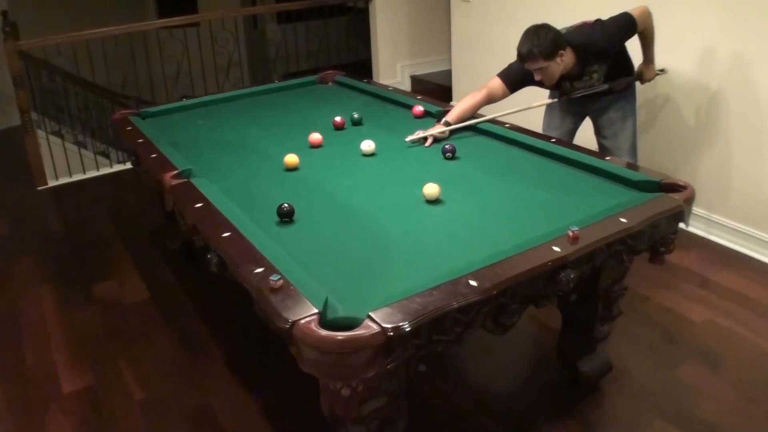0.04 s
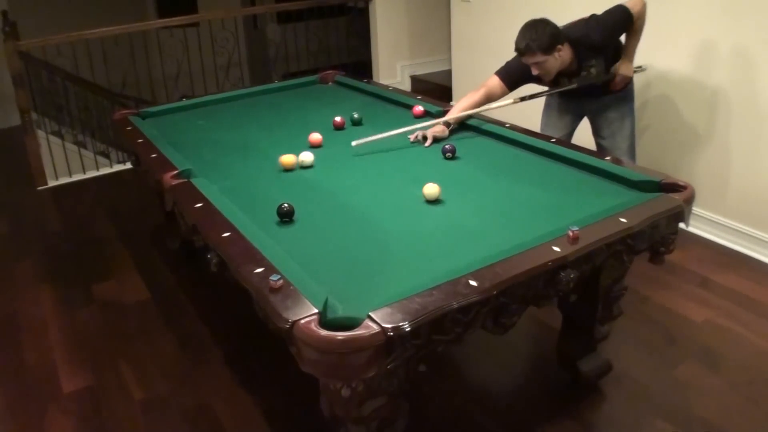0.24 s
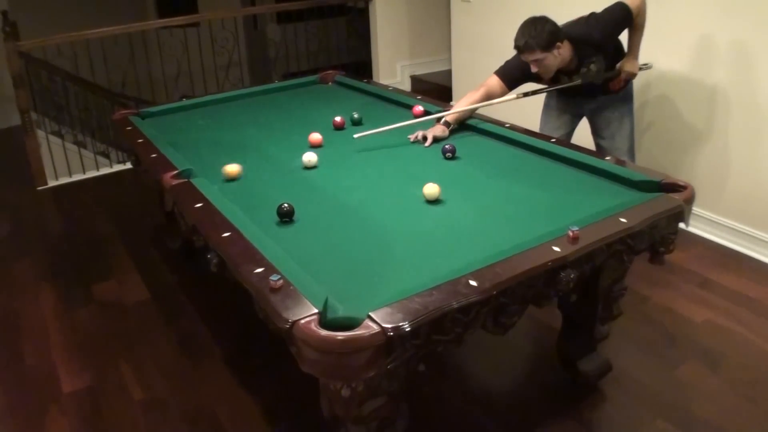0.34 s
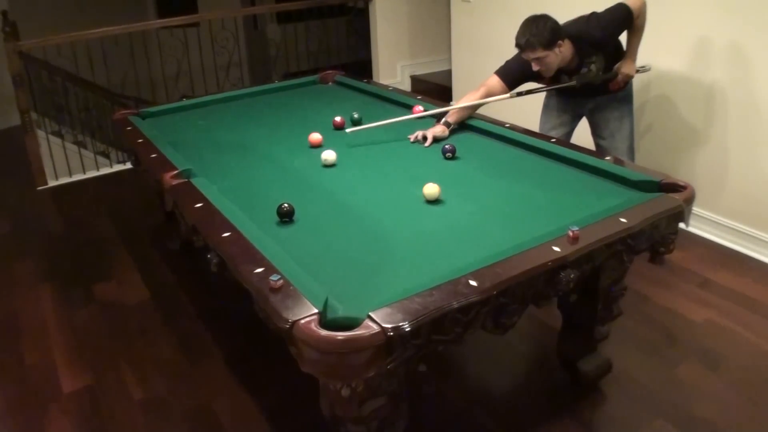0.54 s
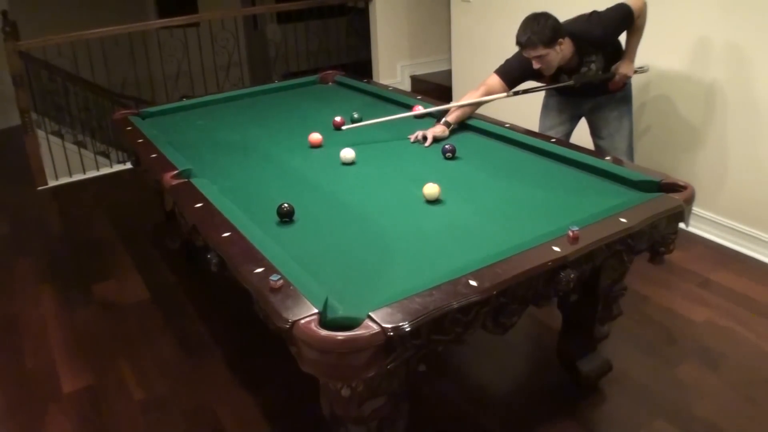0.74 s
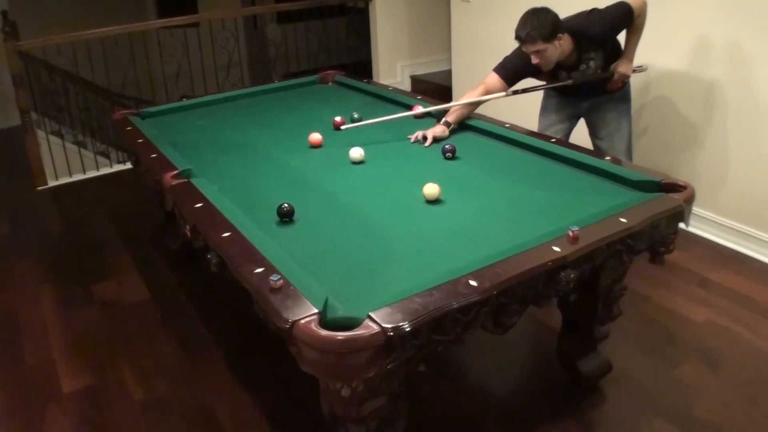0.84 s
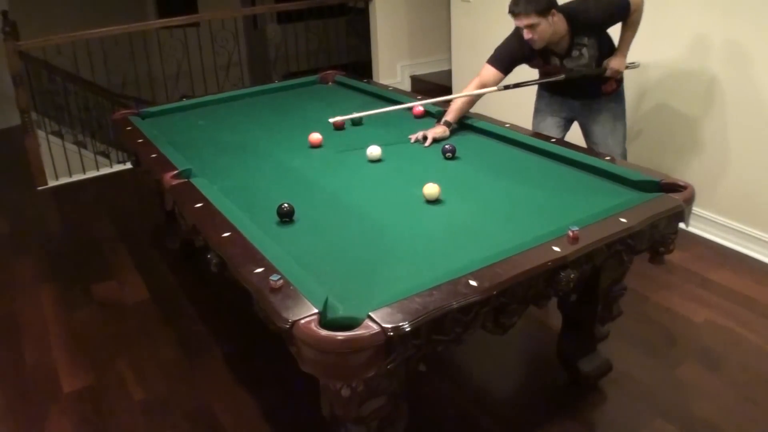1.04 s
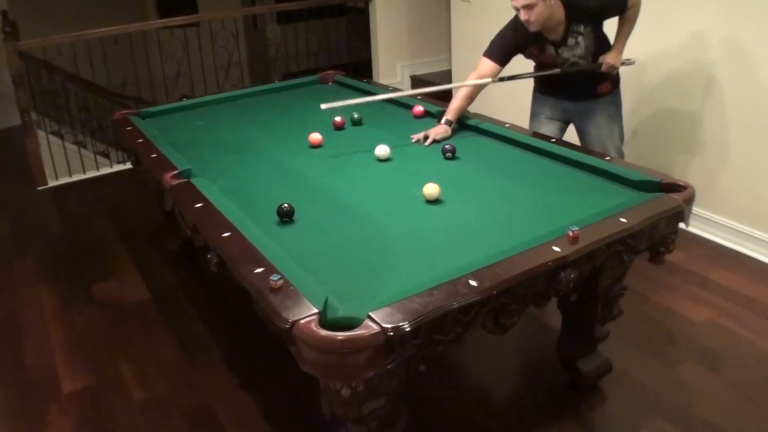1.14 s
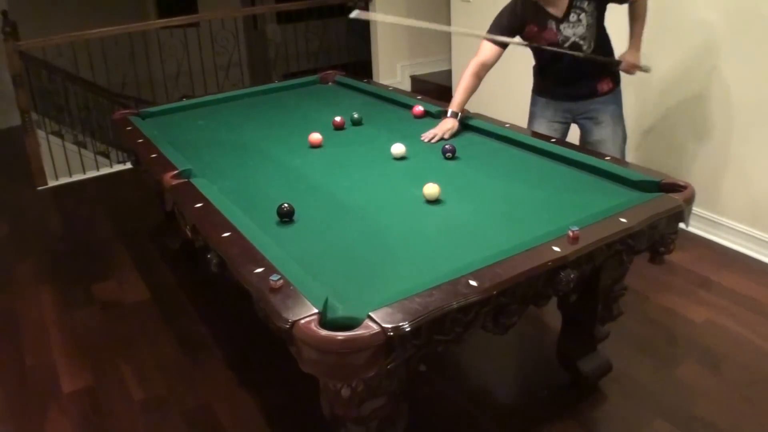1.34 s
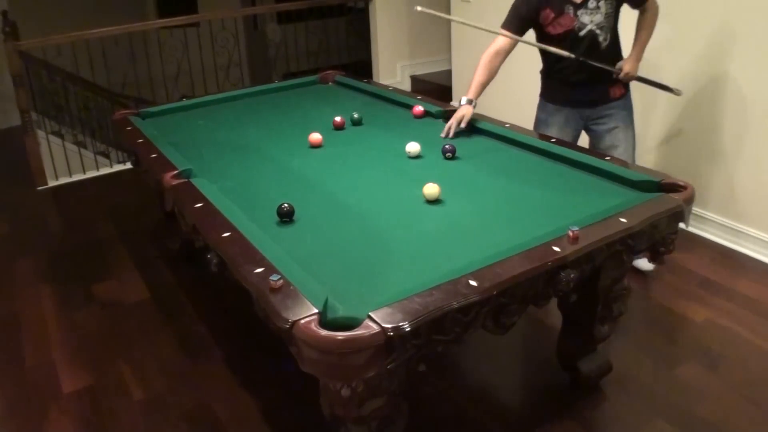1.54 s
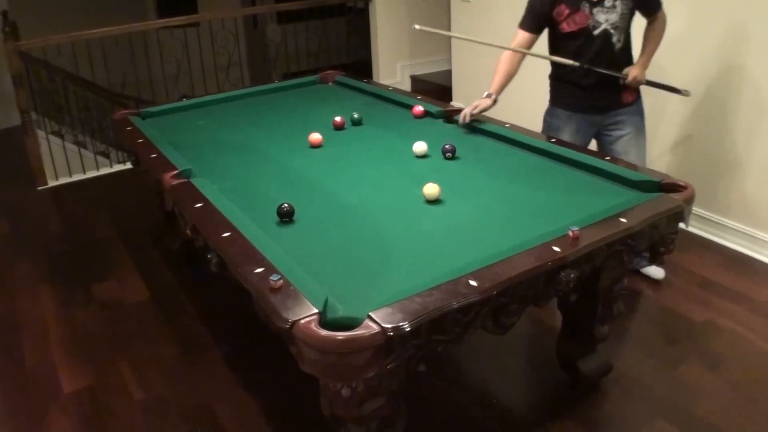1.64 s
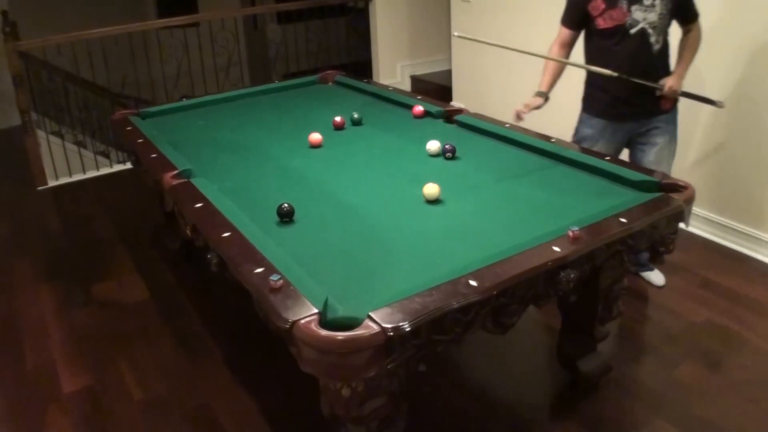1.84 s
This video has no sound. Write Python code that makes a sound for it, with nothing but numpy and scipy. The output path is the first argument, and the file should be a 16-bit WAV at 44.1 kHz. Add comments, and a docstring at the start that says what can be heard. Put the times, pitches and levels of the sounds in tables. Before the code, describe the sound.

A pool shot rings out in a reverberant room. The cue taps a ball, which clacks hard against another; that one rolls briefly, thuds into a padded pocket and clicks against the balls inside. Clothes rustle faintly afterward.

```python
"""Pool shot in a live room

The cue tip knocks the cue ball and the shaft shudders and rings; the cue ball clacks against a second ball.
That ball rolls, thuds into a padded pocket and clicks down on the balls lying there, while the table
frame booms softly. The player's clothes rustle as he straightens up. Every hit rings out in a room
with a wooden floor."""
import sys
import numpy as np
from scipy import signal
from scipy.fft import rfft, irfft
from scipy.io import wavfile

SR = 44100
rng = np.random.default_rng(int(sys.argv[2]) if len(sys.argv) > 2 else 0)


def transcribe(u):
    """Save the signal u as a 16-bit wav file named by the first command-line argument.

    u: samples, shape (n,) or (channels, n), limited to [-1, 1]; the rate is SR.
    q: integer samples, one column per channel.
    """
    v = np.clip(np.atleast_2d(u).T, -1, 1)
    q = np.round(v * 32767).astype(np.int16)
    wavfile.write(sys.argv[1], SR, q)


N = 83790

# glassy snap of ball on ball: freq_hz, relative_db
SNAP_TONE = [(500, -38), (5000, -52), (8000, -17), (9400, 10), (11000, -4), (12500, -12), (13800, -4),
             (15300, -11), (16500, -12)]


def amp(db):
    """Decibels to gain."""
    return 10 ** (np.asarray(db) / 20)


def curve_at(points, hz):
    """Reads a curve on a log-frequency axis."""
    freq_hz, value = np.transpose(points)
    return np.interp(np.log(hz + 1), np.log(freq_hz + 1), value)


def unit(x):
    """Scales to an average energy of 1 per channel."""
    return x / np.sqrt(np.mean(np.sum(x ** 2, -1)) + 1e-20)


def add(mix, start_s, level_db, sound):
    """Lays a stereo sound into the mix."""
    part = mix[:, round(start_s * SR):][:, :sound.shape[1]]
    part += amp(level_db) * sound[:, :part.shape[1]]


def impact(tone, size=4096):
    """A contact: the tightest causal pulse with this spectrum."""
    log_gain = np.log(amp(curve_at(tone, abs(np.fft.fftfreq(size, 1 / SR)))))
    minimum_phase = np.exp(np.conj(signal.hilbert(log_gain)))
    return unit(np.fft.ifft(minimum_phase).real[:size // 2])


def ring(modes, rise_s):
    """A struck body: dying sines with a soft attack."""
    t = np.arange(SR // 2) / SR
    partials = sum(amp(db - 60 * t / t60) * np.sin(2 * np.pi * hz * t) for hz, db, t60 in modes)
    return unit(np.minimum(t / rise_s, 1) * partials)


def diffuse(pair):
    """Gives two unrelated signals the width of a diffuse field, nearly mono in the bass."""
    # likeness of left and right: freq_hz, coherence (0-1)
    coherence = [(60, .993), (130, .987), (280, .973), (450, .945), (700, .81), (1400, .57), (3000, .65),
                 (7000, .57), (10000, .55), (14000, .92)]
    likeness = curve_at(coherence, np.fft.rfftfreq(N, 1 / SR))
    mid, side = rfft(pair) * np.sqrt([(1 + likeness) / 2, (1 - likeness) / 2])
    return irfft(np.array([mid + side, mid - side]), N)


def noise_bed(tone):
    """Diffuse noise of rms 1 with this spectrum."""
    white = diffuse(rng.standard_normal((2, N)))
    spectrum = rfft(white) * amp(curve_at(tone, np.fft.rfftfreq(N, 1 / SR)))
    return unit(irfft(spectrum, N)) * np.sqrt(N)


def fader(points):
    """Gain that rides through points of time_s, level_db."""
    return amp(np.interp(np.arange(N) / SR, *np.transpose(points)))


def room_tail():
    """Grainy reverb that builds quickly and dies band by band, the mids last."""
    # reverb time: freq_hz, t60_s
    decay = [(100, 1.02), (250, 0.94), (600, 1.12), (1400, 1.564), (2500, 1.1), (4200, 1.005), (6500, 0.81),
             (9500, 0.61), (14000, 0.41)]
    predelay_s, build_s, grain_db = 0.0016, 0.0052, 1.5
    t = np.arange(N) / SR
    noise = rng.standard_normal((2, N))
    grain = amp(grain_db * np.repeat(rng.standard_normal(N), SR // 2000)[:N])
    hz, frame_s, bands = signal.stft(diffuse(noise * grain), SR, nperseg=512)
    tail = signal.istft(bands * amp(-60 * frame_s / curve_at(decay, hz)[:, None]))[1][:, :N]
    tail *= 1 - np.exp(-np.maximum(t - predelay_s, 0) / build_s)
    return unit(tail)


def room(sound, room_db, smear_s=0):
    """Direct sound and early reflections, sharp or smeared, then the tail at room_db."""
    # early reflections at full strength: delay_s, left_gain, right_gain
    reflections = [(.0029, 0.25, 0.093), (.0094, -0.55, -.45), (.0152, .45, .45), (.022, .4, .4),
                   (.035, .45, 0.29)]
    tail = amp(room_db) * room_tail()
    early = np.zeros((2, N))
    early[:, 0] = 1
    for delay_s, left, right in reflections:
        early[:, round(delay_s * SR)] += np.array([left, right]) * min(1, amp(room_db))
    if smear_s:
        t = np.arange(N) / SR
        smear = diffuse(rng.standard_normal((2, N))) * t * np.exp(-t / smear_s)
        early = signal.fftconvolve(early, unit(smear), axes=1)[:, :N]
    return signal.fftconvolve(sound[None], early + tail, axes=1)


def room_tone():
    """Soft room noise creeps up in level over a low, swelling rumble."""
    # colours of the noise and the rumble: freq_hz, relative_db
    air_tone = [(20, -22), (55, -14.5), (120, 1.5), (280, -5), (400, -6), (700, -8), (1500, -13),
                (4000, -17), (10000, -18.5), (15500, -26.5)]
    rumble_tone = [(15, -22), (35, 1), (55, 1), (90, -2), (250, -48), (1000, -80)]
    # swell of the rumble: time_s, level_db
    rumble_swell = [(0, -76), (.6, -71), (.78, -53), (1.1, -56), (1.5, -65), (1.65, -59.5), (1.85, -61)]
    start_db, rise_db_per_s = -58, 3
    air = amp(start_db + rise_db_per_s * np.arange(N) / SR) * noise_bed(air_tone)
    return air + fader(rumble_swell) * noise_bed(rumble_tone)


def clothes_rustle():
    """Fabric rubs with a light hiss as the player straightens up."""
    # movement of the fabric: time_s, level_db
    movement = [(0, -93), (.14, -59.5), (.21, -67), (1.1, -56), (1.38, -56.5), (1.45, -56), (1.475, -50.5),
                (1.59, -48), (1.65, -57), (1.72, -63), (1.9, -63)]
    # colour of the fabric: freq_hz, relative_db
    fabric_tone = [(100, -36), (400, -3), (1500, 3.5), (4000, 0.5), (8000, 4), (11000, -2), (15500, -19)]
    return fader(movement) * noise_bed(fabric_tone)


def rolling_balls():
    """Balls roll over the cloth with a dark murmur."""
    # swell and fade of the roll: time_s, level_db
    roll_swell = [(.2, -88), (.24, -37.5), (.33, -44), (.38, -33.5), (.5, -41.5), (.9, -53.5), (1.15, -49),
                  (1.4, -59.5), (1.9, -75)]
    # colour of the roll: freq_hz, relative_db
    roll_tone = [(50, -29), (105, 0.5), (165, -7), (235, -1), (275, -5), (312, 2.5), (360, -10.5),
                 (900, -3.5), (2000, -33), (8000, -68)]
    return fader(roll_swell) * noise_bed(roll_tone)


def table_booms():
    """The heavy frame booms briefly at each push."""
    # pushes on the frame: start_s, level_db
    pushes = [(0.344, -12), (.54, 6), (.595, -4), (0.737, -7), (0.791, -10), (0.924, -7), (0.976, -13.5)]
    # resonances of the frame: pitch_hz, relative_db, t60_s
    frame_modes = [(100, -25, 0.14), (118.7, 5.5, 0.12), (138.3, 1, 0.085)]
    out = np.zeros((2, N))
    for start_s, level_db in pushes:
        add(out, start_s, level_db, room(ring(frame_modes, rise_s=0.019), room_db=-8.5))
    return out


def pocket_thud():
    """The ball thuds into the padding and the pocket rings hollow."""
    # hits on the padding: start_s, level_db, room_db
    thuds = [(0.5247, 7, 2), (.537, 4.5, 0)]
    # colour of a padded hit: freq_hz, relative_db
    thud_tone = [(40, -40), (100, -27), (170, -5.5), (250, 3), (340, 0), (460, 2), (680, -6), (1000, -12),
                 (1300, -5.5), (2000, -16.5), (4500, -29.5), (7500, -34.5), (15000, -52)]
    # resonances of the pocket: pitch_hz, relative_db, t60_s
    pocket_modes = [(227.3, -2, 0.96), (241.5, 3.5, 0.69), (283, -1, .55), (313.3, -6, .65),
                    (373.5, -12, 0.51), (440, 3, 0.55)]
    ring_start_s, ring_db = .535, 8.5
    out = np.zeros((2, N))
    for start_s, level_db, room_db in thuds:
        add(out, start_s, level_db, room(impact(thud_tone), room_db, smear_s=0.0028))
    add(out, ring_start_s, ring_db, room(ring(pocket_modes, rise_s=.035), room_db=-10.5))
    return out


def ball_clicks():
    """Ball knocks on ball, mostly inside the pocket: each a hard click with a glassy snap."""
    # contacts: start_s, level_db, room_db, lean_db (left tops right by half of it),
    # tilt_db_per_octave, snap_db
    clicks = [(0.7152, -0.5, 8.5, -1, 1, -28), (.718, 4.5, 5, -0.5, -.5, -32),
              (0.7204, 4, 4.5, 3, 0.5, -34), (.732, -1.5, 8.5, 1, 0, -32), (.735, 2.5, 5.5, 1, 1.5, -28),
              (.906, -1, 0.5, 3, -3, -45), (1.0347, -2, 2, 1, 4, -14), (1.0364, 2.5, 0, 2.5, -0.5, -21.5),
              (1.1003, -4.5, -4, -3, -3.5, -31), (1.76, -27, -3, -2, 5, -53)]
    # colour of a click before its tilt: freq_hz, relative_db
    click_tone = [(200, -31.5), (500, -15.5), (900, -10), (1120, -19.5), (1530, -7), (2100, -9.5),
                  (2800, -1.5), (4200, 1), (5300, -6.5), (7000, -10), (9600, -11), (10900, -33),
                  (16000, -49)]
    pivot_hz = 4000
    out = np.zeros((2, N))
    for start_s, level_db, room_db, lean_db, tilt, snap_db in clicks:
        tone = [(hz, db + tilt * np.log2(hz / pivot_hz)) for hz, db in click_tone]
        pan = amp([[lean_db / 4], [-lean_db / 4]])
        add(out, start_s, level_db, pan * room(impact(tone), room_db, smear_s=0.00037))
        add(out, start_s, snap_db, room(impact(SNAP_TONE), room_db=-6))
    return out


def cue_stroke():
    """The leather tip lands, then the shaft shudders and rings."""
    # colours of the tip's tick and the shaft's shudder: freq_hz, relative_db
    tip_tone = [(50, -30), (120, 1), (300, 2.5), (700, 11.5), (2000, -8.5), (4000, -2), (6000, -2.5),
                (9300, -5.5), (11500, -16), (16000, -46)]
    shaft_tone = [(60, -30.5), (230, -9), (500, -18.5), (900, -6.5), (1200, -4.5), (1900, -11), (2550, -10),
                  (3300, -16), (4300, -23), (9000, -30.5), (14000, -53)]
    # resonances of the cue: pitch_hz, relative_db, t60_s
    cue_modes = [(988, -6.5, .55), (1203, 5, 0.16), (1470, -5.5, 0.27), (1880, -30, 0.24),
                 (2010, -13, 0.15), (2524, -2.5, 0.25), (3120, -3.5, 0.13), (3336, -13, 0.28),
                 (4120, -13, 0.39), (5470, -18, 0.28), (6200, -19, .25), (8650, -21, .2), (9400, -20, .15)]
    start_s, tip_db, shudder_db, ring_db = .208, -1, 9.5, 10.5
    shudder_peak_s, shudder_width_s = .0145, .0075
    ring_lag_s = .004  # the bending wave builds up after the contact
    t = np.arange(SR // 10) / SR
    burst = rng.standard_normal(len(t)) * np.exp(-((t - shudder_peak_s) / shudder_width_s) ** 2 / 2)
    shudder = unit(signal.fftconvolve(burst, impact(shaft_tone)))
    out = np.zeros((2, N))
    add(out, start_s, tip_db, room(impact(tip_tone), room_db=4, smear_s=0.0015))
    add(out, start_s, shudder_db, room(shudder, room_db=-4))
    add(out, start_s + ring_lag_s, ring_db, room(ring(cue_modes, rise_s=0.0059), room_db=-19))
    return out


def ball_clack():
    """The cue ball hits the second ball: one hard clack that fills the room."""
    # colour of the collision: freq_hz, relative_db
    clack_tone = [(60, -89), (200, -43), (330, -21), (550, -27), (950, -12.5), (1400, -8), (2250, -1.5),
                  (3000, -5), (3900, -13), (5200, -39), (7000, -38), (9300, -36.5), (11000, -45.5),
                  (15500, -41)]
    start_s, clack_db, snap_db = .3128, 7.5, -21
    out = np.zeros((2, N))
    add(out, start_s, clack_db, room(impact(clack_tone), room_db=11.5))
    add(out, start_s, snap_db, room(impact(SNAP_TONE), room_db=-3))
    return out


def scene():
    """The hits of the shot over the noise beds."""
    hits = cue_stroke() + ball_clack() + ball_clicks() + pocket_thud() + table_booms()
    return hits + room_tone() + rolling_balls() + clothes_rustle()


def record(dry):
    """Two microphone ports slightly out of phase, then a steep high cut."""
    # phase lead of the left port over the right: freq_hz, lead_rad
    port_phase = [(30, .08), (120, .1), (300, .14), (780, .3), (2500, .24), (4300, .05), (9000, -.1),
                  (14000, 0)]
    high_cut_hz = 16000
    lead = curve_at(port_phase, np.fft.rfftfreq(2 * N, 1 / SR))
    ports = irfft(rfft(dry, 2 * N) * np.exp(1j * np.array([lead, -lead]) / 2))[:, :N]
    high_cut = signal.firwin(511, high_cut_hz, window=("kaiser", 9), fs=SR)
    return signal.oaconvolve(ports, high_cut[None], "same")


dry = scene()
out = record(dry)
transcribe(out)
```